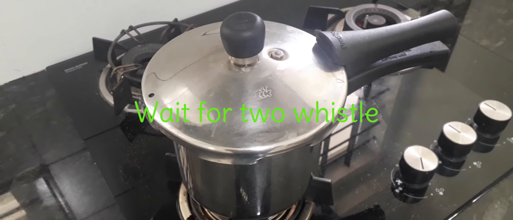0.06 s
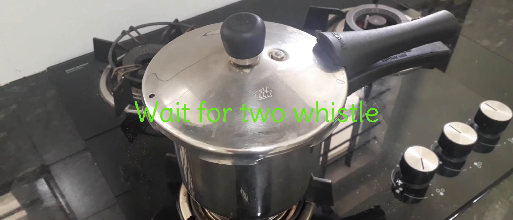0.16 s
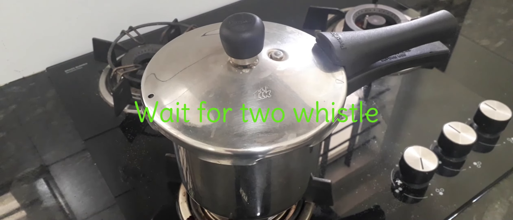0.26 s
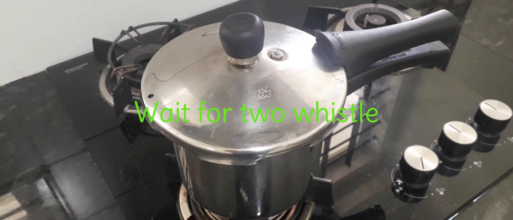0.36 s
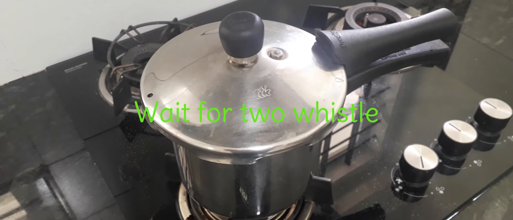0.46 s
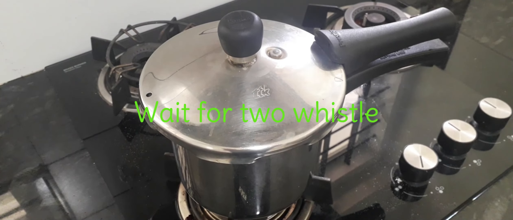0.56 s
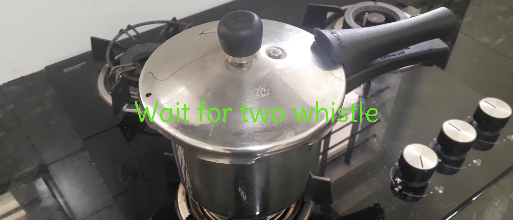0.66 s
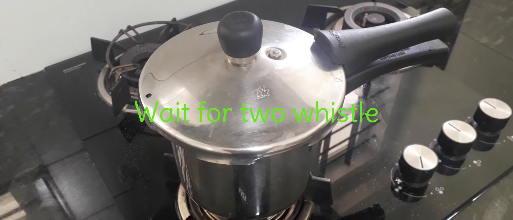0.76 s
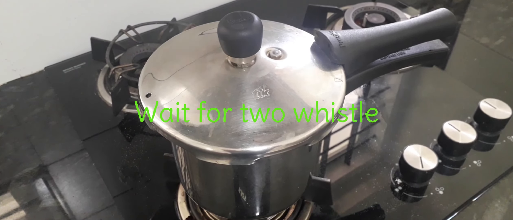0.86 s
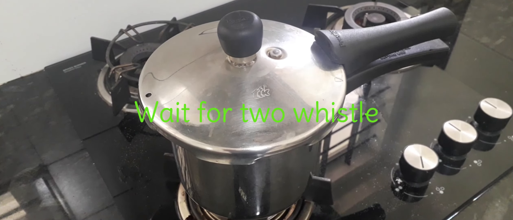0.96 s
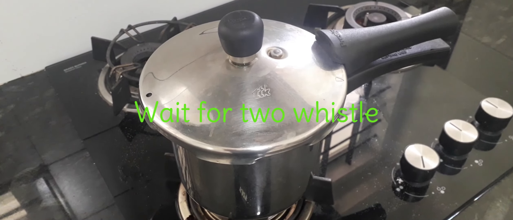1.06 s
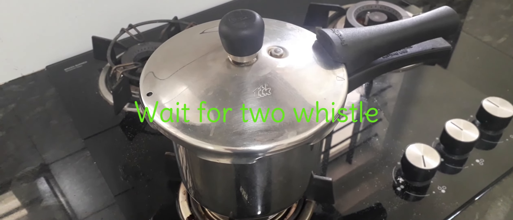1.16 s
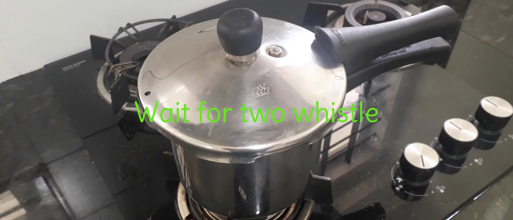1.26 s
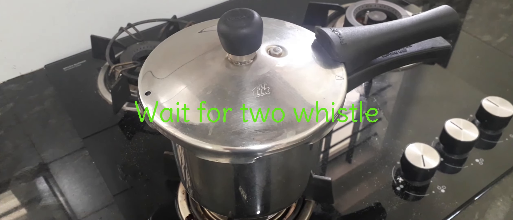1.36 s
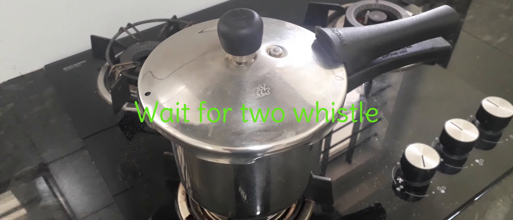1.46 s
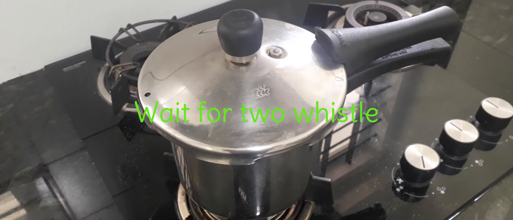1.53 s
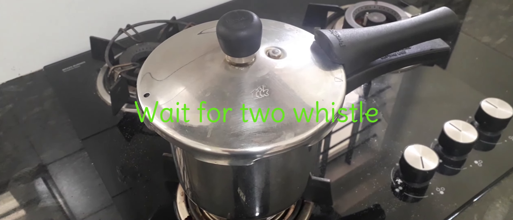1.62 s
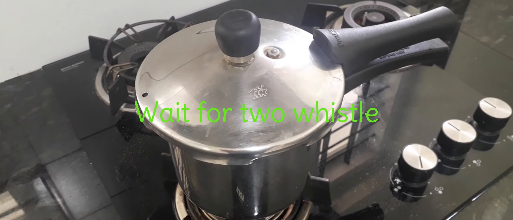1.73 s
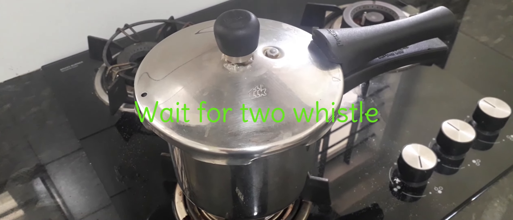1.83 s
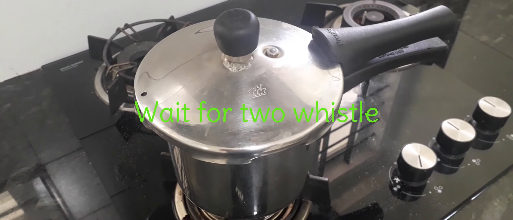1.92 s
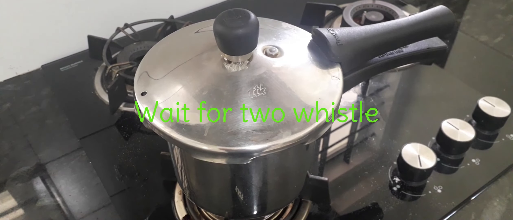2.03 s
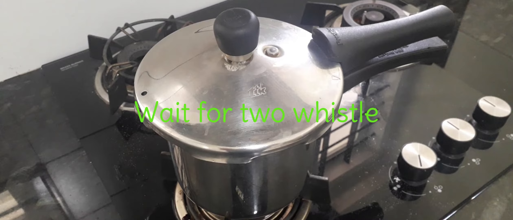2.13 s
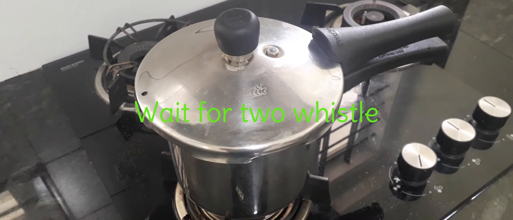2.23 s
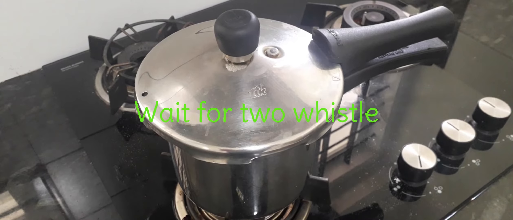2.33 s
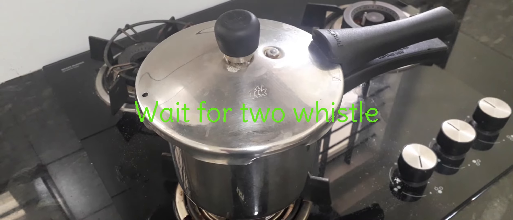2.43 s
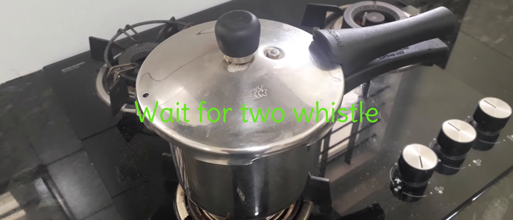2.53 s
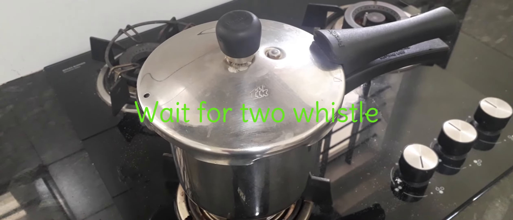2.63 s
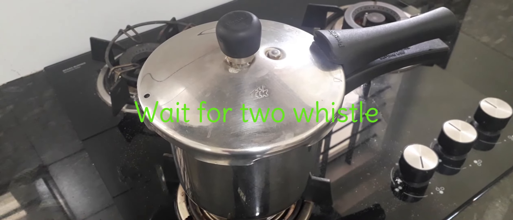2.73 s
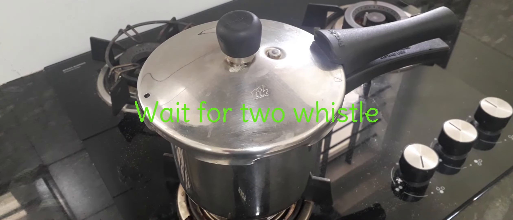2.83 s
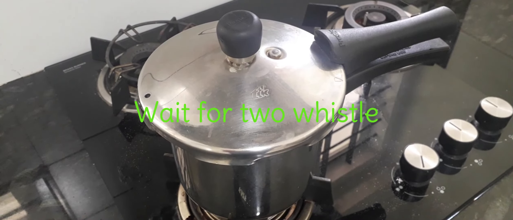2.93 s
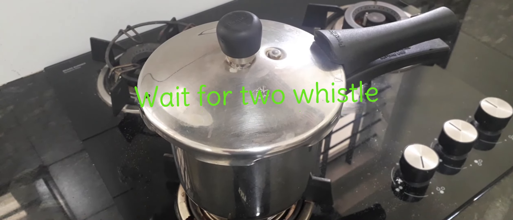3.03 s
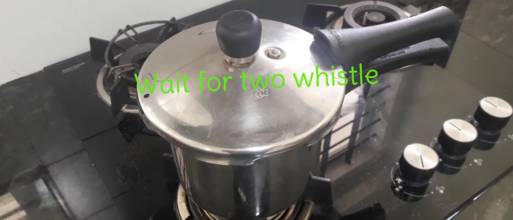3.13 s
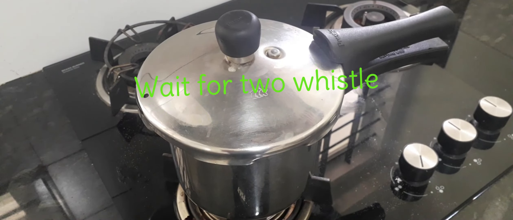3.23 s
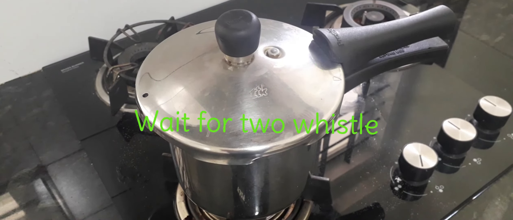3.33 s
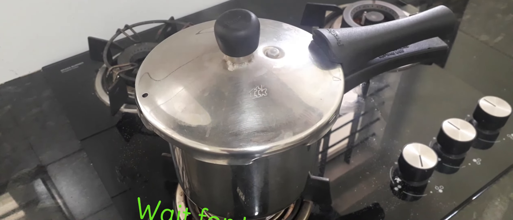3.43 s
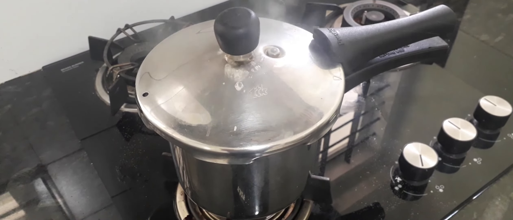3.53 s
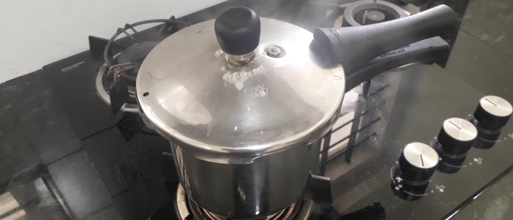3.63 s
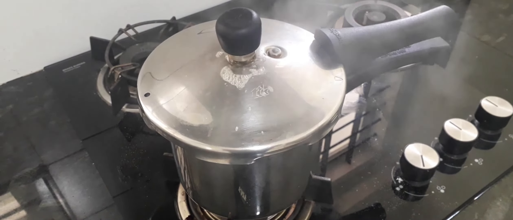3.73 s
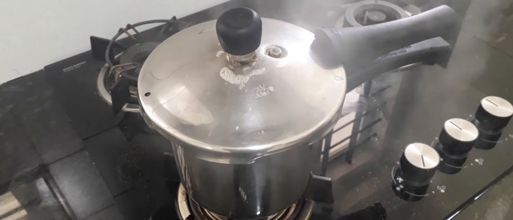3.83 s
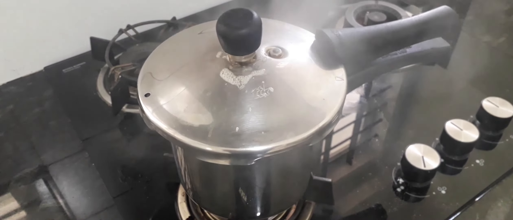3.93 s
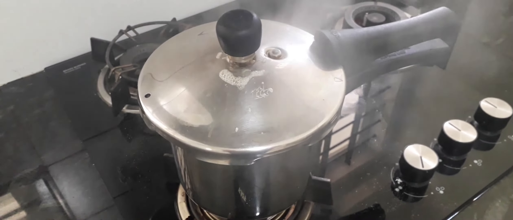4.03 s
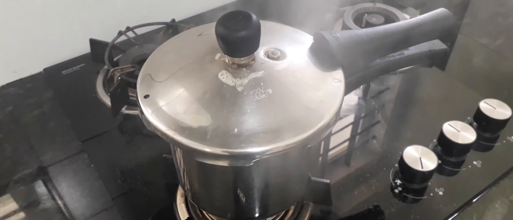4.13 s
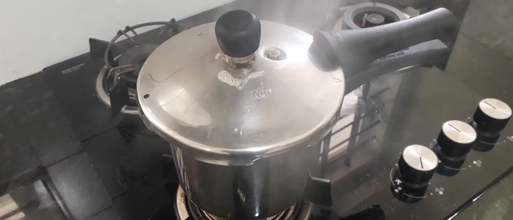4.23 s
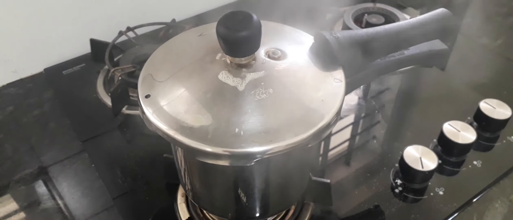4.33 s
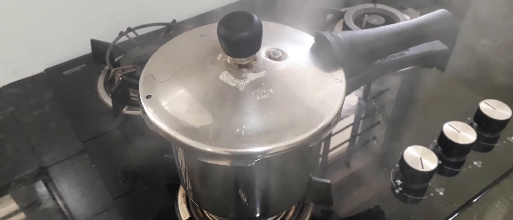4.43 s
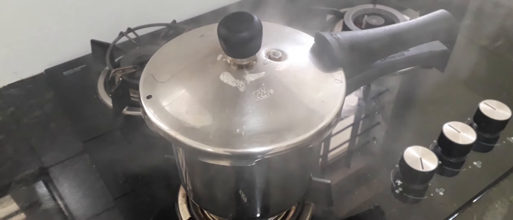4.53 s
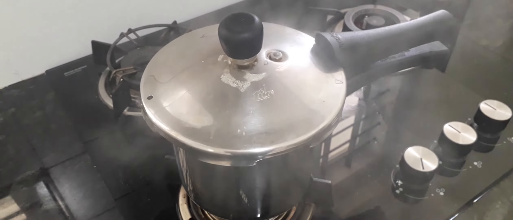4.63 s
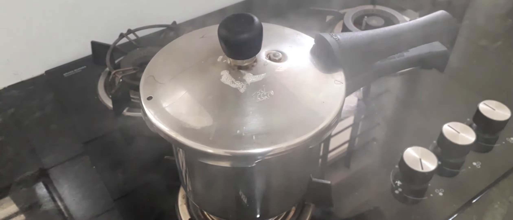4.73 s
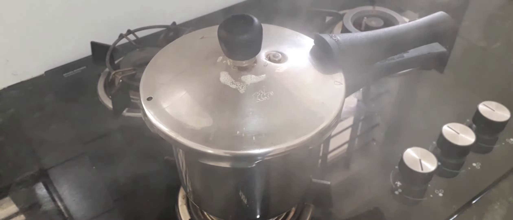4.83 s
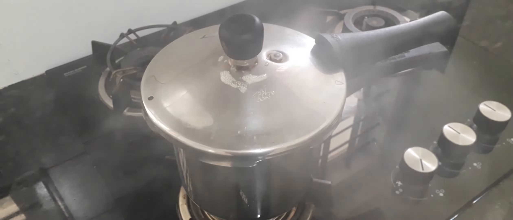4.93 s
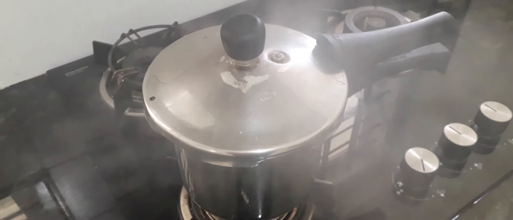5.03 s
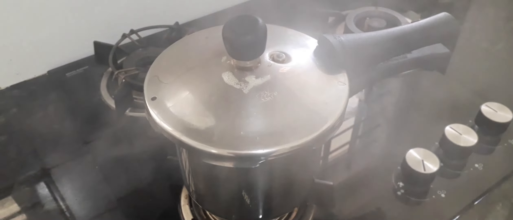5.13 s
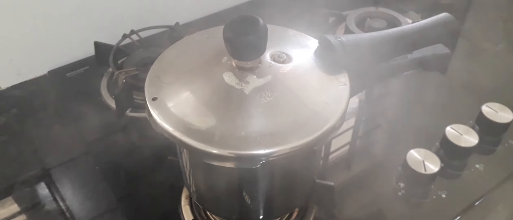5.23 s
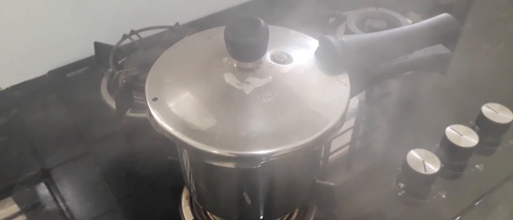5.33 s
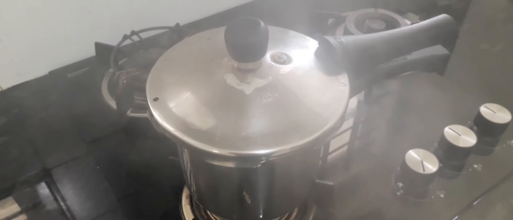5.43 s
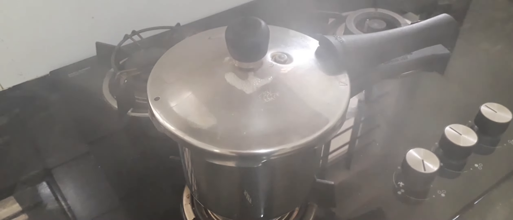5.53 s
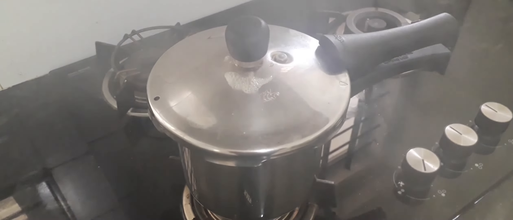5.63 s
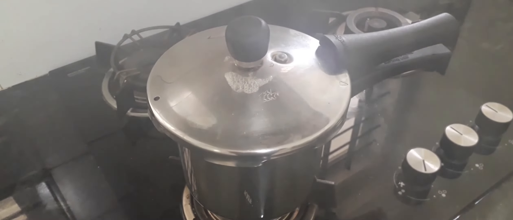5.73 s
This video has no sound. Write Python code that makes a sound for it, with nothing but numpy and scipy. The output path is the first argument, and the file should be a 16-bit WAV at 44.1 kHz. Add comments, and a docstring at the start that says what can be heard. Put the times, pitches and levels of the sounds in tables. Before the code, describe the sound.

Close up in a hard-walled kitchen, a pressure cooker valve leaks wet steam in short, irregular bright spurts over a thin wavering seep, with muffled bubbling and low hums beneath. After about three seconds a low wet gulp opens into a loud, rough, shrill jet of steam lasting two seconds. It weakens slightly, stops abruptly, and the room rings briefly with faint ticks. Mono.

```python
"""Wet steam seeps and spurts from a pressure cooker, then a shrill, noisy whistle blows for two seconds.
The cooker stands on a gas hob in a hard-walled kitchen, heard close up in mono.
Steam is noise shaped by the ringing of the vent and its weight; below it lie muffled bubbling, low hums and a rumble.
The whistle starts with a gulp as the weight lifts; when the weight settles the room rings out."""
import sys
import numpy as np
from scipy import signal
from scipy.fft import rfft, irfft
from scipy.io import wavfile
from scipy.ndimage import uniform_filter1d

SR = 44100
rng = np.random.default_rng(int(sys.argv[2]) if len(sys.argv) > 2 else 0)


def transcribe(u):
    """Save the signal u as a 16-bit wav file named by the first command-line argument.

    u: samples, shape (n,) or (channels, n), limited to [-1, 1]; the rate is SR.
    q: integer samples, one column per channel.
    """
    v = np.clip(np.atleast_2d(u).T, -1, 1)
    q = np.round(v * 32767).astype(np.int16)
    wavfile.write(sys.argv[1], SR, q)


N = 254456
TIME = np.arange(N) / SR   # seconds
BINS = np.maximum(np.arange(N // 2 + 1) * SR / N, 1)   # frequencies in Hz, kept above zero

# Broad colour of the whistling jet. Each row: frequency in Hz, relative level in dB per Hz.
BLAST_COLOUR = [(40, -51), (90, -43), (350, -31), (700, -28.5), (1200, -16), (2450, -11.5), (2850, -5),
                (4700, -17.5), (8500, 2.5), (9200, -10), (11300, -17), (12500, -7), (15600, -13)]
# Ringing of the vent and hollow weight when lifted. Each row: centre in Hz, full width in Hz, boost in dB.
LIFTED_MODES = [(712, 51, 6.7), (1136, 33, 5.7), (1862, 92, 6.3), (2760, 53, 3.4), (2990, 195, 7.3),
                (3256, 110, 2.8), (3410, 204, 9.8), (3625, 27, 5.7), (3770, 100, 6.2), (4064, 1450, 15.3),
                (4600, 29, 1.9), (4950, 230, 3), (5220, 170, 3.5), (5656, 1120, 15.4), (6296, 490, 7.5),
                (7430, 100, 4.8), (7650, 720, 4.3), (14250, 3800, 8.2)]
# Broad colour of the leak past the weight. Each row: frequency in Hz, relative level in dB per Hz.
LEAK_COLOUR = [(600, -19), (1000, -20), (2400, -13.5), (2800, -8), (4700, -5.5), (8200, 2.9), (9200, -7.5),
               (10800, -15), (12400, -1.5), (15600, -6.5)]
# Ringing of the vent and hollow weight when seated. Each row: centre in Hz, full width in Hz, boost in dB.
SEATED_MODES = [(766, 52, 8), (1210, 420, 10.5), (1843, 240, 12), (3680, 1040, 9), (5706, 1070, 13.5),
                (6250, 360, 4), (6420, 120, 6), (7670, 600, 8), (12400, 200, 5.5), (14800, 300, 7)]
# Narrow, hollow colour of the seep. Each row: frequency in Hz, relative level in dB per Hz.
SEEP_COLOUR = [(700, -20), (1900, -16), (2450, -15), (2780, 1), (2950, 2.5), (3500, -2.5), (4600, -20),
               (9000, -23)]
# Spurts as the seated weight rocks. Each row: time of reaching full level in seconds, hold in seconds,
# level in dB before the trim.
SPURTS = [(0.0, 0.056, -35), (0.091, 0.011, -37.5), (0.341, 0.088, -41), (0.445, 0.035, -35),
          (0.538, 0.0057, -43.5), (0.625, 0.0082, -40.5), (0.696, 0.031, -39), (0.812, 0.03, -29),
          (0.92, 0.015, -36.5), (1.024, 0.107, -36.5), (1.15, 0.048, -34), (1.287, 0.32, -42),
          (1.484, 0.026, -40.8), (1.56, 0.032, -27), (1.674, 0.035, -38.5), (1.808, 0.051, -27),
          (1.962, 0.04, -35.2), (2.084, 0.029, -30), (2.193, 0.009, -36.5), (2.291, 0.04, -31),
          (2.402, 0.028, -38.5), (2.51, 0.054, -33.0), (2.601, 0.24, -44), (2.775, 0.117, -37.5),
          (2.968, 0.129, -38.5), (3.112, 0.062, -30.5), (3.253, 0.042, -33.2)]
# Gulps of wet steam as the weight lifts and as it sinks back. Each row: time of reaching full level in
# seconds, hold in seconds, level in dB.
GULPS = [(3.426, 0.052, -34.5), (5.37, 0.057, -49.5)]
# Broad colour of the gulps. Each row: frequency in Hz, relative level in dB per Hz.
GULP_COLOUR = [(50, -35), (100, -10), (180, -5.5), (450, -4), (900, 3.5), (1300, 4.5), (2200, -0.5),
               (4000, -43)]
# The weight touching its seat. Each row: start in seconds, strength in dB before the trim.
SEAT_TOUCHES = [(5.486, -32), (5.612, -42)]
# Bubbling and the hums under it. Each row: time in seconds, bubbling level in dB, level of the hums in dB.
BOIL_LEVELS = [(0, -57, -69), (0.3, -58, -59.5), (0.55, -53, -57.5), (1.05, -53, -56), (1.35, -53, -64),
               (2.1, -56, -55.5), (2.5, -56, -67), (2.9, -60, -70), (3.08, -59.5, -61), (3.7, -55, -67),
               (5.3, -60, -70), (5.77, -65, -70)]
# Broad colour of the bubbling. Each row: frequency in Hz, relative level in dB per Hz.
BOIL_COLOUR = [(90, -14.5), (220, -10), (310, -0.5), (480, -0.5), (700, -3), (1200, -8), (3000, -14)]
# Low hums under the boil; the one near 351 Hz is perhaps a fan or the room.
# Each row: centre in Hz, half width in Hz, relative level in dB.
HUM_TONES = [(173, 22, -11), (256, 4.4, -5.5), (351.3, 4.1, 0), (507, 11, -9)]
# Loudness of the deep rumble. Each row: time in seconds, level in dB.
RUMBLE_LEVEL = [(0, -75.5), (1.2, -78), (1.7, -72), (2.9, -72), (3.08, -64), (3.7, -65), (4.5, -72.5),
                (5.28, -72), (5.41, -64), (5.53, -74), (5.77, -85)]
# Broad colour of the rumble. Each row: frequency in Hz, relative level in dB per Hz.
RUMBLE_COLOUR = [(30, -18), (55, -11), (75, -5.5), (105, -0.5), (140, -4.5), (185, 3.5), (300, -19),
                 (700, -36), (3000, -73)]
# Echoes of the kitchen. Each row: frequency in Hz, time to die by 60 dB in seconds, relative strength in dB.
KITCHEN_ECHO = [(300, 0.81, 0.5), (800, 0.79, 1.5), (2280, 0.93, 4.5), (3480, 0.86, -3), (4930, 0.78, 3.5),
                (5800, .65, -3.5), (6900, .63, 5), (7800, 0.66, -1.5), (9500, 0.67, 1), (14000, 0.45, -1)]

# Steam is hollow below the first frequency; its sizzle lies above the second.
HOLLOW_HZ, SIZZLE_HZ = 4600, 11000
CUTOFF_HZ = 15750   # top of the final sound

# The weight starts to lift, takes a moment to open, and drops back.
LIFT_S, OPENING_S, DROP_S = 3.3355, 0.16, 5.331
# The jet sags as the pressure drains: full level, loss one second after opening, power of time it follows.
JET_DB, SAG_DB, SAG_CURVE = -13.5, 2.47, 1.38
# Level of the hollow part against the hiss; extra power of the opening that it needs.
HOLLOW_DB, HOLLOW_LAG = -3, 0.48
SHUT_DB_PER_S = 262
AFTERFLOW_DB, AFTERFLOW_DB_PER_S = -12, 69   # hollow flow that lingers while the weight beds in
# Water thrown out at the lift brightens the top for a moment.
JET_SIZZLE_DB, SPRAY_DB, SPRAY_S = 1, 3.5, 0.14

SPURT_RISE_DB_PER_S, SPURT_FALL_DB_PER_S = 367, 391
# Trim of the spurts and tight hiss; untrimmed hiss that gets past a tightly seated weight.
SPURT_TRIM_DB, TIGHT_DB = 0.5, -51
# Starting level of the unchoked seep; it chokes when the untrimmed leak falls below the second level.
SEEP_DB, SEEP_CHOKE_DB = -41, -47
SEEP_DRYING_DB_PER_S = 0.7   # the seep weakens slowly
LEAK_SIZZLE_DB, SIZZLE_RISE_DB_PER_S = -0.4, 1.17   # the leak brightens as the pressure builds

GULP_RISE_DB_PER_S, GULP_FALL_DB_PER_S = 600, 168


def from_db(db):
    """Turn decibels into a gain."""
    return 10 ** (np.asarray(db) / 20)


def rms(x):
    """Average strength of a sound (root mean square)."""
    return np.sqrt(np.mean(x ** 2) + 1e-20)


def in_time(rows):
    """Read each column of a curve at every sample, joining its points by straight lines."""
    s, *columns = np.transpose(rows)
    return [np.interp(TIME, s, column) for column in columns]


def at_hz(points, hz, axis=1):
    """Read one column of a table at any frequency, on a logarithmic scale."""
    columns = np.transpose(points)
    return np.interp(np.log(hz), np.log(columns[0]), columns[axis])


def colour(spectrum, modes=()):
    """Gain at each frequency: a broad slope with resonant humps, falling away below its lowest point."""
    humps = sum(boost / (1 + (2 * (BINS - hz) / width) ** 2) for hz, width, boost in modes)
    low_fade = np.minimum(BINS / spectrum[0][0], 1) ** 2
    return from_db(at_hz(spectrum, BINS) + humps) * low_fade


def filtered(x, gain):
    """Apply a gain at each frequency."""
    return irfft(rfft(x) * gain, N)


def turbulence(gain):
    """Rushing flow as coloured noise of rms 1."""
    noise = filtered(rng.standard_normal(N), gain)
    return noise / rms(noise)


def flutter(rate_hz):
    """A slow random wander of rms 1."""
    return turbulence(1 / (1 + (BINS / rate_hz) ** 2))


def swells(events, rise_db_per_s, fall_db_per_s):
    """Summed power of events that each rise, hold and fall."""
    power = 0
    for s, hold, db in events:
        before = np.maximum(s - TIME, 0)
        after = np.maximum(TIME - s - hold, 0)
        power = power + from_db(db - rise_db_per_s * before - fall_db_per_s * after) ** 2
    return power


def steam(gain, sizzle_db, rough_db, rough_hz):
    """Turbulence chopped by the water it carries, split into a hollow lower part and a bright hiss of rms 1."""
    chopped = rng.standard_normal(N) * from_db(rough_db * flutter(rough_hz))
    source = filtered(chopped, gain)
    hollow = filtered(source, 1 / (1 + (BINS / HOLLOW_HZ) ** 16))
    sizzle = filtered(source, 1 / (1 + (SIZZLE_HZ / BINS) ** 16))
    hiss = source - hollow + sizzle * (from_db(sizzle_db) - 1)
    # one shared scale keeps the balance of the two parts
    return hollow / rms(hiss), hiss / rms(hiss)


def blast():
    """The jet swells as the weight rises, sags with the pressure and is cut at the drop; its hollow part lingers."""
    opening = np.clip((TIME - LIFT_S) / OPENING_S, 0, 1)
    open_s = np.maximum(TIME - LIFT_S - OPENING_S, 0)
    shut_s = np.maximum(TIME - DROP_S, 0)
    jet = opening * from_db(JET_DB - SAG_DB * open_s ** SAG_CURVE)
    gap = from_db(-SHUT_DB_PER_S * shut_s)
    lingering = np.maximum(gap, from_db(AFTERFLOW_DB - AFTERFLOW_DB_PER_S * shut_s))

    sizzle_db = JET_SIZZLE_DB + SPRAY_DB * opening * np.exp(-open_s / SPRAY_S)
    hollow, hiss = steam(colour(BLAST_COLOUR, LIFTED_MODES), sizzle_db, rough_db=0.6, rough_hz=120)
    hollow_level = lingering * opening ** HOLLOW_LAG * from_db(HOLLOW_DB)
    return jet * (gap * hiss + hollow_level * hollow / rms(hollow))


def leak(close_s=0.033, waver_db=2.6, tremble_db=0.83):
    """Bright spurts over a hollow seep that chokes when the weight sits tight; both fade out at the lift."""
    seated = np.clip((LIFT_S - TIME) / close_s + 1, 0, 1)
    spurt_power = swells(SPURTS, SPURT_RISE_DB_PER_S, SPURT_FALL_DB_PER_S)
    flow = np.sqrt(spurt_power + from_db(TIGHT_DB) ** 2)
    sizzle_db = LEAK_SIZZLE_DB + SIZZLE_RISE_DB_PER_S * np.minimum(TIME, LIFT_S)
    hollow, hiss = steam(colour(LEAK_COLOUR, SEATED_MODES), sizzle_db, rough_db=1.0, rough_hz=250)
    spurts = from_db(SPURT_TRIM_DB + tremble_db * flutter(25)) * flow * (hollow + hiss)

    unchoked = flow ** 2 / (flow ** 2 + from_db(SEEP_CHOKE_DB) ** 2)
    seep_db = SEEP_DB - SEEP_DRYING_DB_PER_S * TIME + waver_db * flutter(16)
    seep = unchoked * from_db(seep_db) * turbulence(colour(SEEP_COLOUR))
    return seated * (spurts + seep)


def gulp(rough_db=1.5):
    """Wet steam makes low, spluttering puffs at both ends of the jet."""
    puffs = np.sqrt(swells(GULPS, GULP_RISE_DB_PER_S, GULP_FALL_DB_PER_S))
    return puffs * from_db(rough_db * flutter(80)) * turbulence(colour(GULP_COLOUR))


def ticks(decay_s=0.0014, trim_db=-6):
    """The weight touches its seat: very short cracks of noise with the colour of the seated valve."""
    strikes = 0
    for s, db in SEAT_TOUCHES:
        strikes = strikes + from_db(db) * (TIME >= s) * np.exp(-np.abs(TIME - s) / decay_s)
    return from_db(trim_db) * strikes * turbulence(colour(LEAK_COLOUR, SEATED_MODES))


def boil():
    """Bubbling muffled by the closed lid, low hums under it, and a rumble that swells near the lift and drop."""
    bubbling_db, hum_db = in_time(BOIL_LEVELS)
    rumble_db, = in_time(RUMBLE_LEVEL)
    bubbling = from_db(bubbling_db) * turbulence(colour(BOIL_COLOUR))
    hums = from_db(hum_db) * low_hums()
    rumble = from_db(rumble_db) * turbulence(colour(RUMBLE_COLOUR))
    return bubbling + hums + rumble


def low_hums(waver_db=3.0):
    """Low hums made of narrow bands of noise, each wavering on its own."""
    hums = 0
    for hz, half_width, db in HUM_TONES:
        tone = turbulence(1 / (1 + ((BINS - hz) / half_width) ** 2))
        # even out the tone's own ups and downs before adding the waver
        steady = tone / np.sqrt(uniform_filter1d(tone ** 2, size=SR // 8) + 0.12)
        hums = hums + steady * from_db(db + waver_db * flutter(2.7))
    return hums / rms(hums)


def kitchen(x, wet_db=-10, first_echo_s=0.0032):
    """Dense wall echoes, built octave by octave as fading noise; the highest treble dies first."""
    t, response = TIME[:SR], 0
    for hz in 125 * 2 ** np.arange(8):
        edges = [hz / np.sqrt(2), min(hz * np.sqrt(2), 0.45 * SR)]
        band = signal.butter(2, edges, "band", fs=SR, output="sos")
        fade = np.exp(-np.log(1000) * t / at_hz(KITCHEN_ECHO, hz))
        response = response + signal.sosfilt(band, rng.standard_normal(SR)) * fade
    response = response * (t > first_echo_s)
    response = response / np.sqrt(np.sum(response ** 2))
    # the walls hear the jet from all sides, so its humps are evened out
    sent = filtered(x, from_db(wet_db + at_hz(KITCHEN_ECHO, BINS, axis=2)))
    return signal.fftconvolve(sent, response)[:N]


def scene():
    """The valve's sounds fill the kitchen above the boil; both channels are alike."""
    valve = blast() + leak() + gulp() + ticks()
    mono = valve + kitchen(valve) + boil()
    return np.stack([mono, mono])


def record(dry, top=1.9):
    """The highest peaks are rounded, the deepest bass is lost and the top is cut steeply."""
    rounded = top * np.tanh(dry / top)
    bass_cut = 1 / (1 + (30 / BINS) ** 4)
    treble_cut = 1 / (1 + (BINS / CUTOFF_HZ) ** 400)
    return filtered(rounded, bass_cut * treble_cut)


dry = scene()
out = record(dry)
transcribe(out)
```